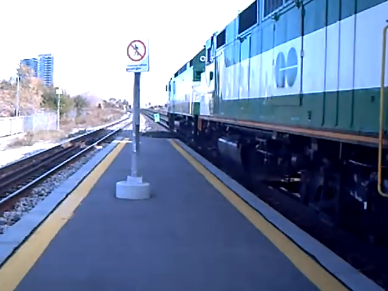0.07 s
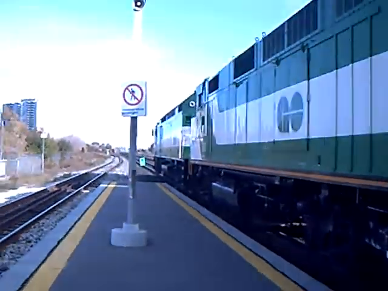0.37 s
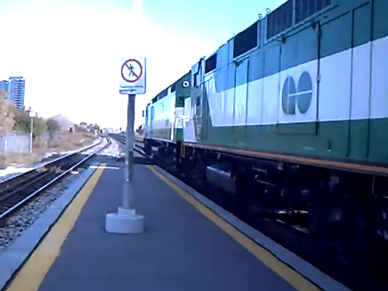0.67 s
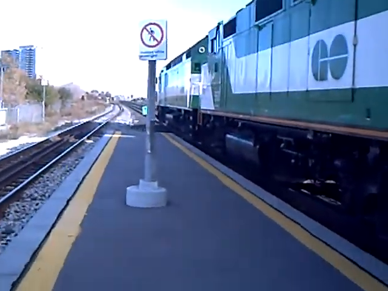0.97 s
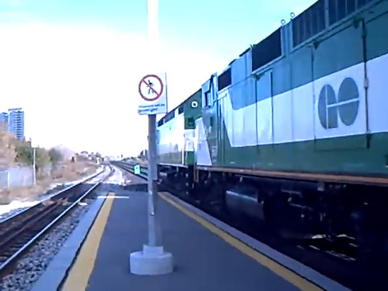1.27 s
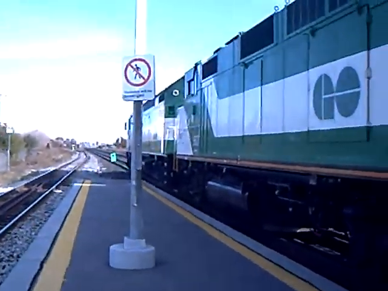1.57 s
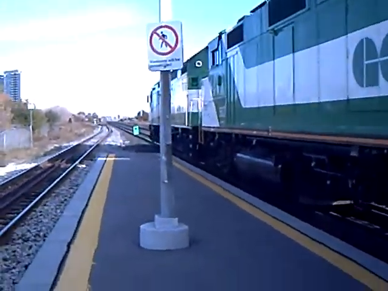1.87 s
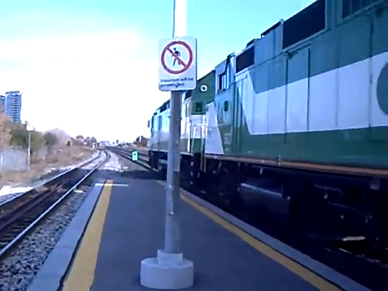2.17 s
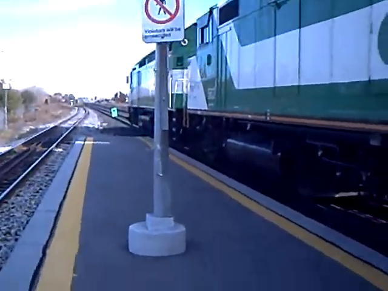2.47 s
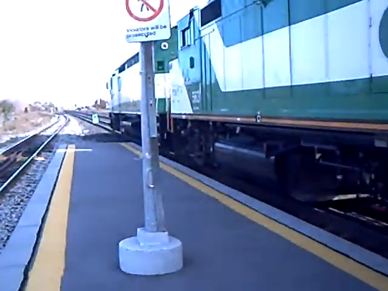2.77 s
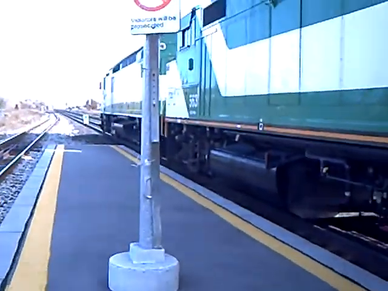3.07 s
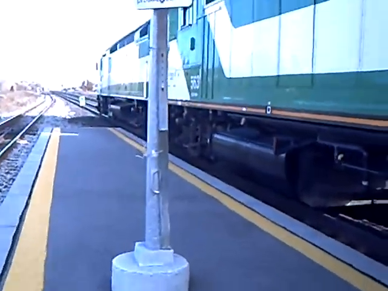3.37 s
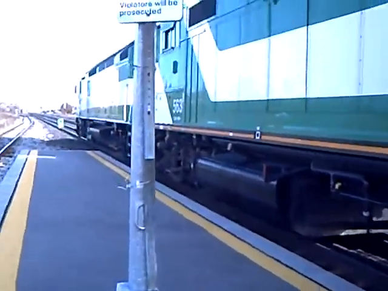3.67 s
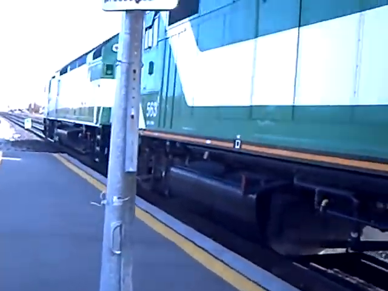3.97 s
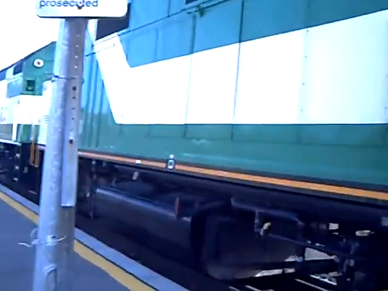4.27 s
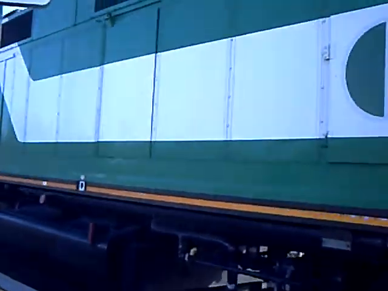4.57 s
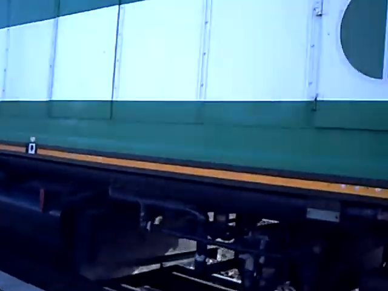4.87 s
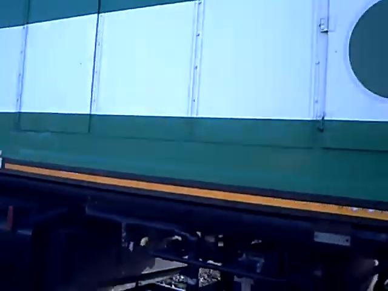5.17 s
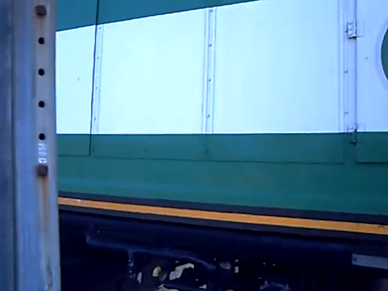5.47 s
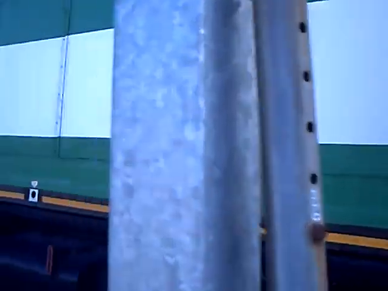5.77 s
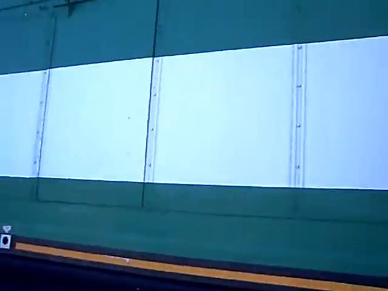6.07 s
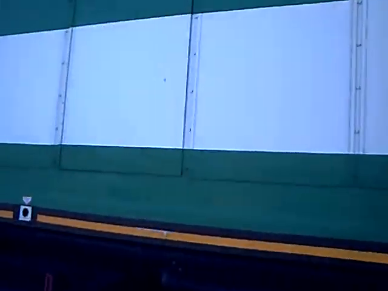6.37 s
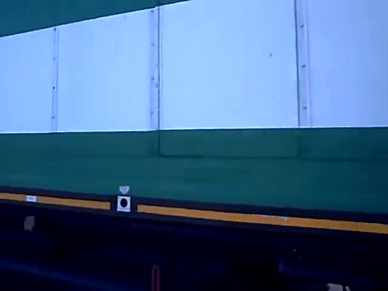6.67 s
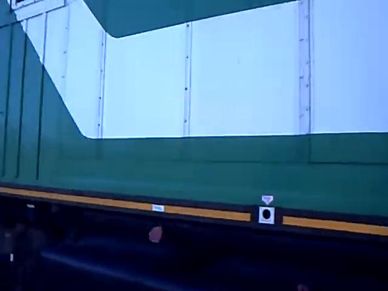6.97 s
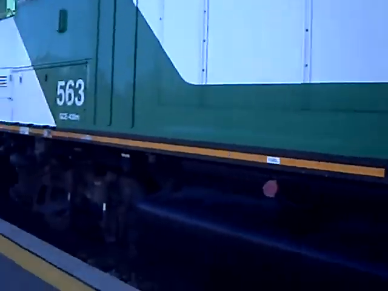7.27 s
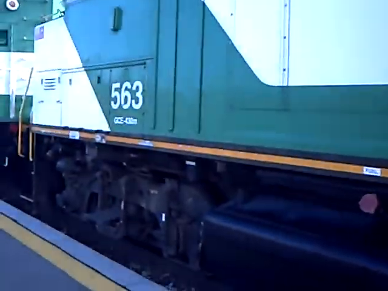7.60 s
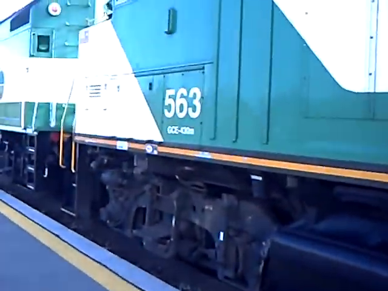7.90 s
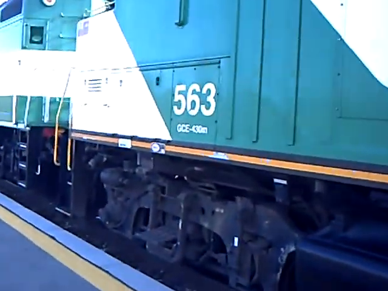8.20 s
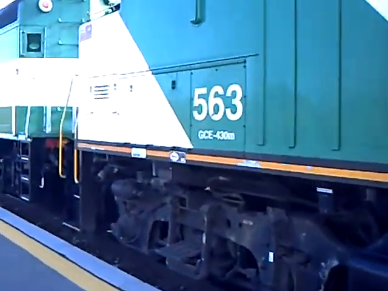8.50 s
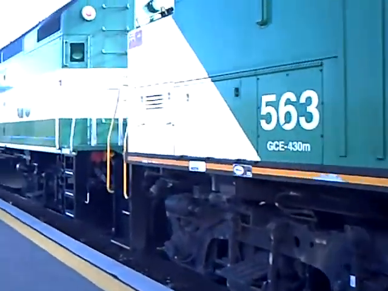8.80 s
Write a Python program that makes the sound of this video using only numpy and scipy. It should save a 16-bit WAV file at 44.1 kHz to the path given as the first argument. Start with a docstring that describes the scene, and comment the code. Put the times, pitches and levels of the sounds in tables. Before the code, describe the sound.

Deep diesel locomotive rumble, humming fans and high whistles grow louder on approach, with light wind gusts and brief spits of air.

```python
"""A walk along a platform beside a standing diesel locomotive. From the start its generator set and fans
drone, with a second locomotive idling behind. The main engine winds up, mostly in the first 4 s, its
geared turbocharger whistling higher in step; thin squeals flare and the air system spits now and then.
Gusts brush the microphone, mostly from 4.5 to 7 s, as the engine room nears and its roar and clatter grow.
An air intake rasps past at 7.3 s, and a last spit of air hisses just before the end."""
import sys
import numpy as np
from scipy import signal
from scipy.fft import rfft, irfft, next_fast_len
from scipy.io import wavfile

SR = 44100
rng = np.random.default_rng(int(sys.argv[2]) if len(sys.argv) > 2 else 0)


def persist_wave(psi):
    """Save psi, clipped to +-1, as 16-bit WAV."""
    counts = np.round(np.clip(psi, -1, 1) * 32767).astype(np.int16)
    wavfile.write(sys.argv[1], SR, np.atleast_2d(counts).T)


N = 398663
T = np.arange(N) / SR
HZ = np.fft.rfftfreq(N, 1 / SR)
FULL_CRANK_HZ, GENERATOR_HZ, IDLER_HZ = 8.187, 30.11, 5.38  # shaft turns a second
SQUEAL_HZ = 2770

# Swells of the cooling air's hiss, which clatter and gear whine also ride: time_s, relative_db
HISS_SWELLS = [(0.0, -63), (0.78, -61), (1.26, -58.5), (1.81, -62.5), (1.91, -57), (3.57, -54.5),
               (4.73, -52.5), (4.78, -53.5), (6.04, -54.5), (6.39, -48), (6.67, -50), (7.38, -47.5),
               (7.63, -50.5), (7.68, -45), (7.98, -51.5), (9.04, -49.5)]


def gain_of(db):
    """Decibels to amplitude."""
    return 10 ** (np.asarray(db) / 20)


def unit_rms(x):
    """Scales to rms 1."""
    return x / np.sqrt(np.mean(x ** 2) + 1e-20)


def curve(points):
    """A line through (time_s, value) points, at every sample."""
    return np.interp(T, *np.transpose(points))


def between(far_db, near_db, near):
    """A level that moves from its far to its near value along the walk."""
    return far_db + near * (near_db - far_db)


def following(db, share):
    """A level that makes only a share of another's swells."""
    return db.mean() + share * (db - db.mean())


def shaped(gain):
    """Noise of rms 1 with the given gain at each frequency."""
    size = next_fast_len(N)
    spectrum = rfft(rng.standard_normal(size)) * np.interp(np.fft.rfftfreq(size, 1 / SR), HZ, gain)
    return unit_rms(irfft(spectrum, size)[:N])


def coloured(points):
    """Noise with a spectrum of (frequency_hz, relative_db) points, falling away above the last."""
    hz, db = np.transpose(points)
    rolloff = 1 + (HZ / (2 * hz[-1])) ** 2
    return shaped(gain_of(np.interp(np.log(HZ + 1), np.log(hz), db)) / rolloff)


def drift(rate_hz):
    """Random motion of rms 1, mostly slower than rate_hz."""
    return shaped(1 / (1 + (HZ / rate_hz) ** 2) ** 2)


def tone(turns):
    """A sine of rms 1."""
    return np.sqrt(2) * np.sin((2 * np.pi * (turns % 1)).astype(np.float32))


def noise_band(hz, width_hz):
    """A narrow band of noise that follows a pitch."""
    slope = 1 / np.sqrt((1 + (2 * HZ / width_hz) ** 2) * (1 + (HZ / (2 * width_hz)) ** 2))
    turns = np.cumsum(hz * np.ones(N)) / SR
    return unit_rms(shaped(slope) * tone(turns) + shaped(slope) * tone(turns + 1 / 4))


def fluttering(hz, jitter_hz, dropout_hz):
    """A fluttering whistle: it wobbles and keeps cutting out for a few milliseconds."""
    gate = 1 + np.tanh(1.6 * drift(dropout_hz) + .6)
    return unit_rms(gate * tone(np.cumsum(hz + jitter_hz * drift(209.7)) / SR))


def shaft_tones(turns, rows, near):
    """Tones at the nearest half multiples of a shaft's speed; their balance shifts along the train."""
    return sum(gain_of(between(far_db, near_db, near))
               * tone(round(2 * multiple) / 2 * turns + rng.random())
               for multiple, far_db, near_db in rows)


def throb(turns, depth):
    """Swells once in every turn, keeping the mean power."""
    return unit_rms(np.exp(depth * tone(turns)))


def idling_locomotive(near):
    """The neighbour's exhaust drones at a steady idle, wavering in level."""
    # Exhaust tones, ahead of the -4 dB trim: shaft_multiple, far_db, near_db
    partials = [(3, -47, -51), (7, -63, -64), (8, -57, -58), (9, -43.5, -23), (10, -51, -28),
                (11, -44, -31), (15, -38, -52), (16, -50, -34), (24, -49, -43.5), (31, -43, -77),
                (47.7, -55, -45)]
    drone = shaft_tones(IDLER_HZ * T + .001 * drift(1.0), partials, near)
    return drone * gain_of(-4.0 + 1.16 * drift(5.4))


def fans(near):
    """Blade tones that fade and waver as echoes off the train and platform shift."""
    # The blower's tone swells and fades along the walk: time_s, relative_db
    blower_swells = [(0.0, -59), (1.01, -50), (1.23, -42.5), (2.36, -45.5), (3.93, -47), (4.43, -31),
                     (5.31, -41), (5.36, -31), (6.57, -39), (7.07, -29), (7.35, -29), (7.45, -46),
                     (7.55, -33.5), (8.46, -30.5), (8.66, -54), (8.71, -28), (8.91, -28), (9.04, -36)]
    # The cooling fan's tone swells and fades too: time_s, relative_db
    cooling_swells = [(0.0, -45), (0.17, -42.5), (1.76, -48), (2.24, -42), (2.29, -46), (3.8, -39.5),
                      (3.85, -48.5), (6.67, -42.5), (6.75, -42), (6.8, -35.5), (7.38, -46), (7.48, -34),
                      (7.85, -45), (8.28, -31.5), (8.46, -45), (9.04, -39)]
    # The other fans and blowers: pitch_hz, far_db, near_db
    blade_tones = [(238.4, -46.5, -31), (343, -59, -53), (429.7, -53, -39.5), (472.7, -49.5, -45),
                   (642, -50, -40), (680, -59, -51), (710.7, -46, -41.5), (939, -51, -62), (1218, -54, -48)]
    blower_hz, cooling_hz, fade_rate_hz = 515.3, 849.2, 4.0
    out = gain_of(curve(blower_swells) - 1.3) * tone(blower_hz * T + 0.037 * drift(4.9))
    cooling = tone(cooling_hz * T + .15 * drift(6.0))
    out += gain_of(curve(cooling_swells) + 2.1 + 2.4 * drift(fade_rate_hz)) * cooling
    for hz, far_db, near_db in blade_tones:
        db = between(far_db, near_db, near) + 2.6 * drift(fade_rate_hz)
        out += gain_of(db) * tone(hz * T + hz / 4500 * drift(1.5))
    return out


def cooling_air():
    """Rushing air makes a flickering treble hiss."""
    # Colour of the hiss: frequency_hz, relative_db
    colour = [(1500, -2.5), (3200, -2.5), (4150, 0), (4550, 2), (5800, 2), (6500, 3.5), (8000, 0.5),
              (9400, -7), (10800, -20)]
    return coloured(colour) * gain_of(curve(HISS_SWELLS) + 8.0 + 1.57 * drift(30))


def generator_hum(generator_turns, near):
    """The generator set's exhaust hums, firing six times a turn."""
    # Tones beside the firing tone: shaft_multiple, far_db, near_db
    partials = [(1, -60, -50), (1.5, -55, -54), (3, -45, -36), (4, -52, -46), (4.5, -46, -40),
                (5, -37.5, -44.5), (7, -49, -47), (8, -41.5, -32), (10, -51.5, -46), (11, -42, -43),
                (20, -53, -65)]
    # The firing tone's hum, dipping near 4 s and growing toward the end: time_s, relative_db
    firing_swells = [(0.0, -37.5), (0.95, -32), (3.83, -35), (4.0, -53), (4.13, -38), (5.51, -34),
                     (5.54, -39), (9.01, -23.5), (9.04, -21)]
    firing = tone(6 * generator_turns) * gain_of(curve(firing_swells) + 0.57)
    return shaft_tones(generator_turns, partials, near) + firing


def generator_whistles():
    """A high whistle, its octave and a thin lower note swell together; shifting echoes make them fade."""
    # Swells of the high whistle: time_s, relative_db
    swells = [(0.0, -57), (1.38, -53), (1.91, -56), (1.96, -48.5), (2.26, -55.5), (3.93, -52.5),
              (3.95, -45), (4.03, -51), (4.56, -53.5), (4.71, -49), (5.31, -64), (5.89, -55), (5.97, -56),
              (6.42, -51.5), (7.98, -51.5), (9.04, -53)]
    whistle_hz, swell_db = 5055, curve(swells)
    whistle = fluttering(whistle_hz + 10 * drift(6.0), jitter_hz=42, dropout_hz=70)
    whistle *= gain_of(swell_db + 3.0 + 2.6 * drift(11))
    octave = noise_band(2 * whistle_hz + 25 * drift(11.5), width_hz=140)
    octave *= gain_of(following(swell_db, share=0.61) - 5 + 1.4 * drift(25))
    thin_note = noise_band(SQUEAL_HZ, width_hz=12)
    thin_note *= gain_of(following(swell_db, share=0.44) - 3.5 + 2.6 * drift(11))
    return whistle + octave + thin_note


def pump():
    """A pump's faint, even whine."""
    return noise_band(2245, width_hz=39) * gain_of(-60)


def squeals():
    """Short swells of one thin, nearly pure note."""
    # Flares of the squeal: peak_s, level_db
    flares = [(.57, -44.5), (.76, -49), (2.28, -48), (2.72, -50), (3.04, -49), (3.78, -47), (4.13, -47),
              (4.84, -47), (6.5, -42), (6.72, -46), (8.33, -43.5)]
    half_length_s = 0.033
    swell = sum(gain_of(db) * np.exp(-((T - peak_s) / half_length_s) ** 2) for peak_s, db in flares)
    return swell * tone(SQUEAL_HZ * T + 0.18 * drift(12))


def intake():
    """Air rasps through a grille, heard only from close by."""
    closest_s, half_pass_s = 7.3, .36
    passing = gain_of(-38.5) / (1 + ((T - closest_s) / half_pass_s) ** 2)
    return passing * noise_band(2352, width_hz=330)


def gusts():
    """Lumps of wind flutter over the microphone."""
    # Single gusts: peak_s, level_db, half_length_s
    lumps = [(2.156, -32, 0.07), (2.592, -28.5, 0.04), (4.52, -20, 0.035), (4.746, -25.5, 0.17),
             (4.997, -22.5, 0.096), (5.325, -25.5, 0.13), (5.458, -21, 0.037), (5.754, -26, 0.26),
             (5.96, -21.5, 0.05), (6.833, -22.5, 0.06)]
    # Colour of the wind's rumble: frequency_hz, relative_db
    colour = [(10, -5), (30, -3.5), (140, -7), (300, -8), (470, -10.5), (620, -21), (1500, -38),
              (4000, -57)]
    power = sum(gain_of(db) ** 2 * np.exp(-((T - peak_s) / half_s) ** 2) for peak_s, db, half_s in lumps)
    flutter = gain_of(1.5 * drift(60))
    return np.sqrt(power) * unit_rms(coloured(colour) * flutter)


def air_spits():
    """Valves snap and let off short bursts of sputtering air."""
    # Snaps and spits: start_s, level_db, hold_s, decay_s, centre_hz, spread (natural log of frequency)
    bursts = [(1.2105, -26, 0.0018, .0007, 2900, .95), (4.548, -35, .008, 0.0048, 2000, 0.63),
              (5.033, -25, .003, .003, 1200, .8), (6.835, -36, .015, .01, 2500, 0.42),
              (7.1382, -16, 0.0014, 0.0006, 5400, 1.5), (8.876, -35.5, .09, .04, 7900, 0.6)]
    out = np.zeros(N)
    for start_s, db, hold_s, decay_s, centre_hz, spread in bursts:
        envelope = (T >= start_s) * np.exp(-np.maximum(T - start_s - hold_s, 0) / decay_s)
        band = np.exp(-(np.log((HZ + 1) / centre_hz) / spread) ** 2)
        out += gain_of(db) * envelope * shaped(band)
    sputter = unit_rms(gain_of(1.5 * drift(610)))
    return out * sputter


def valve_clatter(crank_turns, near, below_full_hz):
    """The main engine's valve gear rattles, pulsing lightly eight times a turn."""
    # Colour of the clatter: frequency_hz, relative_db
    colour = [(700, -7), (1500, -7), (1900, 1), (2250, 1.5), (2550, -3.5), (2900, -3), (3400, -10),
              (5000, -24.5)]
    db = between(-42.5, -37.5, near) - 1.46 * below_full_hz
    db += 0.21 * signal.detrend(curve(HISS_SWELLS))
    return coloured(colour) * throb(8 * crank_turns, depth=0.03) * gain_of(db + 1.25 * drift(27))


def exhaust_roar(generator_turns, near, below_full_hz):
    """A low roar that grows as the main engine winds up and throbs lightly with the generator set."""
    # The roar from afar: frequency_hz, relative_db
    far_colour = [(8, -5), (25, 6.5), (58, 10.5), (105, 1.5), (180, -1), (400, -0.5), (560, -4.5),
                  (740, -0.5), (950, -4.5), (1250, -8), (1550, -17), (2500, -28.5)]
    # The roar beside the engine room: frequency_hz, relative_db
    near_colour = [(8, -10), (25, 3), (60, -0.5), (105, -0.5), (145, 10.5), (200, 0), (290, 7), (400, 3),
                   (560, 1.5), (820, 1.5), (1250, -3), (1650, -12), (2500, -25)]
    blend = np.clip(near, 0, 1)
    roar = np.sqrt(1 - blend) * coloured(far_colour) + np.sqrt(blend) * coloured(near_colour)
    db = between(-28, -25, near) - 2 * below_full_hz
    return roar * throb(3 * generator_turns, depth=0.043) * gain_of(db + 0.47 * drift(28))


def turbocharger(crank_hz):
    """Blades geared to the crank whistle over the whine of their gears, both rising with the engine."""
    # Swells of the blade whistle: time_s, level_db
    swells = [(0.0, -51.5), (0.88, -50.5), (1.23, -42), (1.38, -45), (2.84, -44.5), (3.12, -37.5),
              (3.37, -46), (3.42, -33.5), (3.47, -43), (3.52, -41.5), (4.4, -40.5), (4.43, -37.5),
              (5.89, -42), (6.39, -37), (7.28, -35), (8.46, -38), (8.96, -33.5), (9.04, -42)]
    blade_hz, gear_hz = 881 * crank_hz, 484 * crank_hz
    whistle = fluttering(blade_hz + 12 * drift(15), jitter_hz=68, dropout_hz=200)
    whistle += gain_of(-9) * noise_band(blade_hz + 60, width_hz=820)  # breathy skirt
    whistle *= gain_of(curve(swells) + 1.1 * drift(89) + 0.76 * drift(11))
    hiss_db = curve(HISS_SWELLS)
    gear_db = -53.5 + hiss_db - hiss_db.mean()
    return whistle + noise_band(gear_hz, width_hz=58) * gain_of(gear_db + 1.15 * drift(8.0))


def main_exhaust(crank_turns, near, below_full_hz):
    """The main engine's exhaust tones climb with the crank, 3 dB louder for each turn a second gained."""
    # Exhaust tones at full speed: shaft_multiple, far_db, near_db
    partials = [(5, -54, -56), (8, -29, -20.5), (9, -35, -32), (16, -44, -38), (17, -45.5, -52),
                (19, -59, -43), (24, -49, -40.5), (31.56, -46, -42), (34.44, -51.5, -52),
                (44.1, -52.5, -52), (46.2, -50, -68)]
    return shaft_tones(crank_turns, partials, near) * gain_of(-3 * below_full_hz)


def scene():
    """All machines, heard in mono from the moving microphone."""
    # The main engine winding up: time_s, crank_hz
    wind_up = [(0, 6.279), (0.5, 6.474), (1, 6.792), (1.5, 7.128), (2, 7.393), (2.5, 7.606), (3, 7.778),
               (4, 7.968), (5, 8.071), (6, 8.147), (7, 8.158), (8, 8.175), (9.04, 8.187)]
    # The walk toward the engine room: time_s, nearness (0 far, about 1 near)
    walk = [(0, 0.11), (2.2, 0.036), (3.4, 0.22), (3.9, 0.19), (4.7, 0.5), (6.1, .6), (6.8, 0.83),
            (8, 0.93), (9.04, 1.06)]
    crank_hz, near = curve(wind_up), curve(walk)
    below_full_hz = FULL_CRANK_HZ - crank_hz
    crank_turns = np.cumsum(crank_hz) / SR + 0.0023 * drift(1.1)
    generator_turns = GENERATOR_HZ * T + 0.0013 * drift(1.7)
    bed = idling_locomotive(near) + fans(near) + cooling_air()
    bed += generator_hum(generator_turns, near) + generator_whistles() + pump()
    accents = squeals() + intake() + gusts() + air_spits()
    engine = valve_clatter(crank_turns, near, below_full_hz)
    engine += exhaust_roar(generator_turns, near, below_full_hz)
    engine += turbocharger(crank_hz) + main_exhaust(crank_turns, near, below_full_hz)
    return (bed + accents + engine)[None]


def record(dry):
    """A steep low-pass takes off the treble above 11.1 kHz."""
    taps = signal.firwin(1023, 11130, window=("kaiser", 9), fs=SR)
    return signal.oaconvolve(dry, taps[None], "same")


dry = scene()
out = record(dry)
persist_wave(out)
```